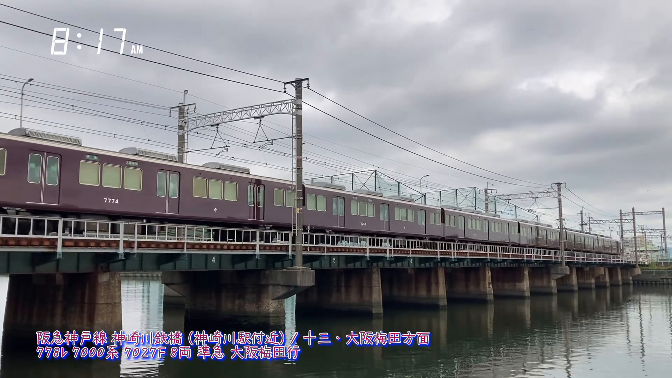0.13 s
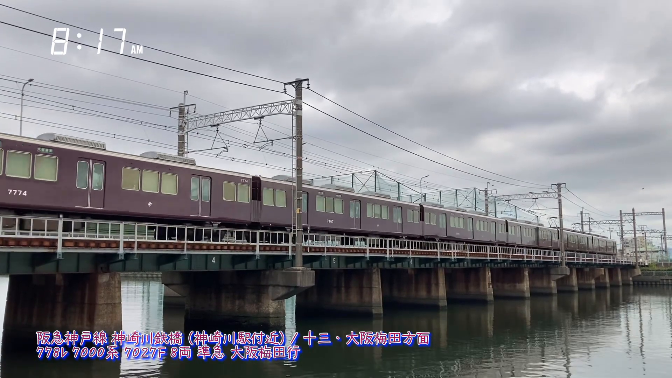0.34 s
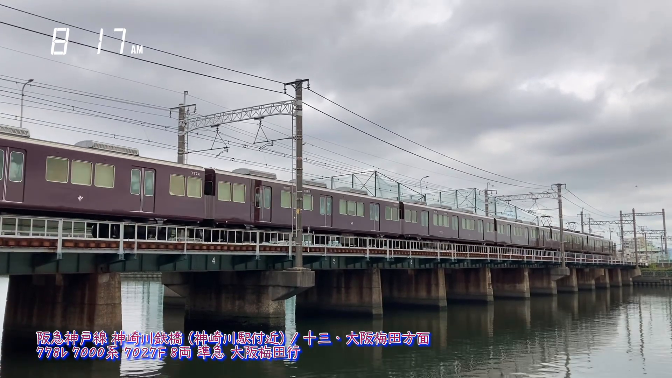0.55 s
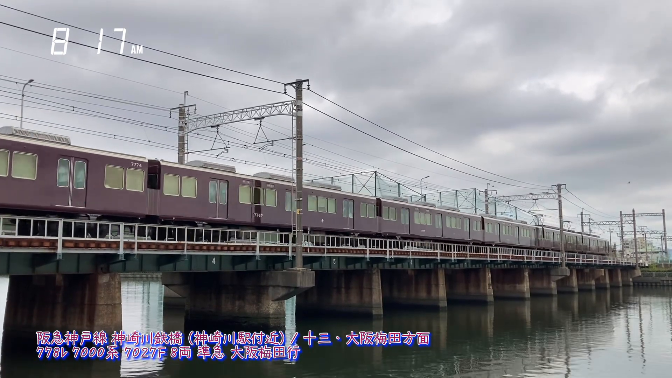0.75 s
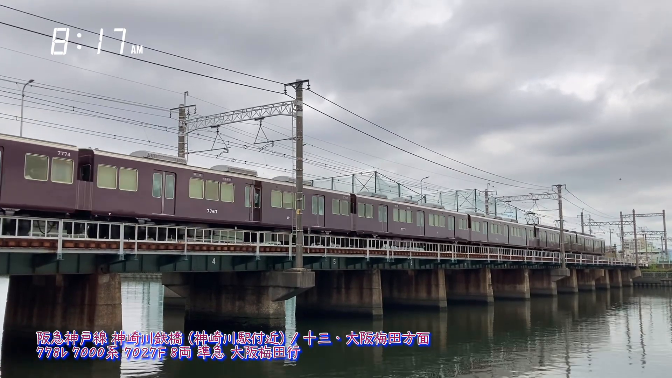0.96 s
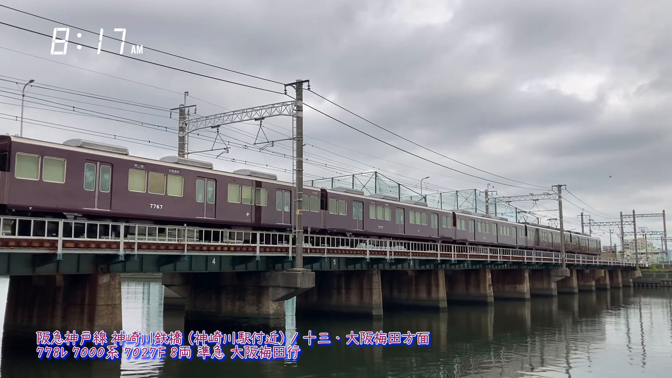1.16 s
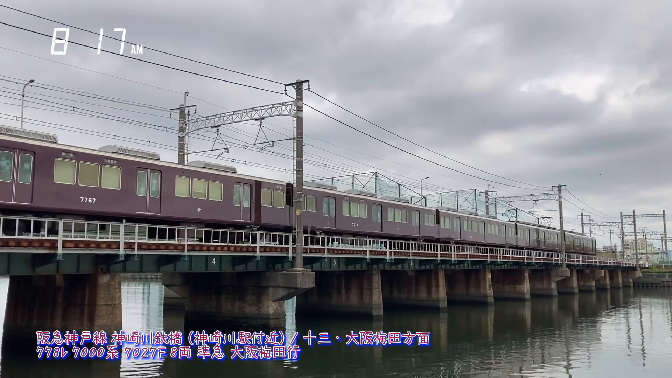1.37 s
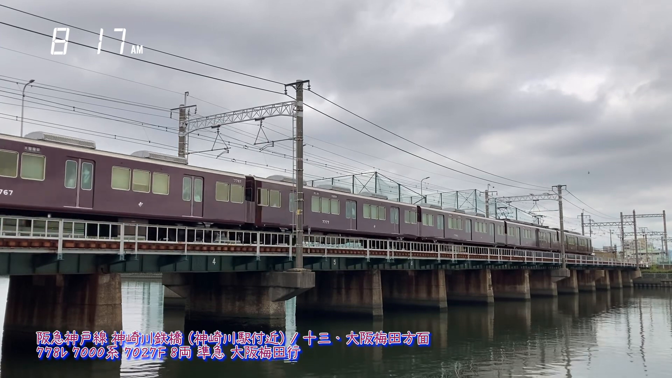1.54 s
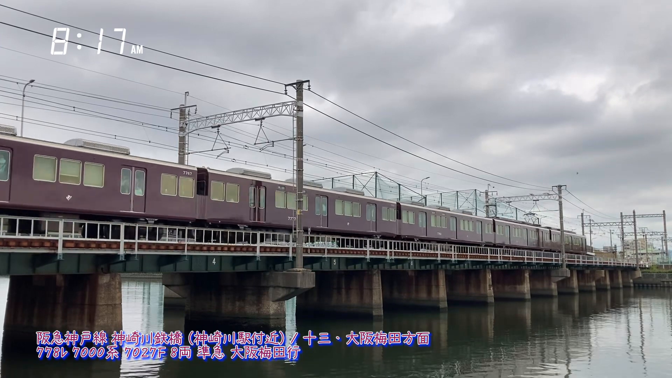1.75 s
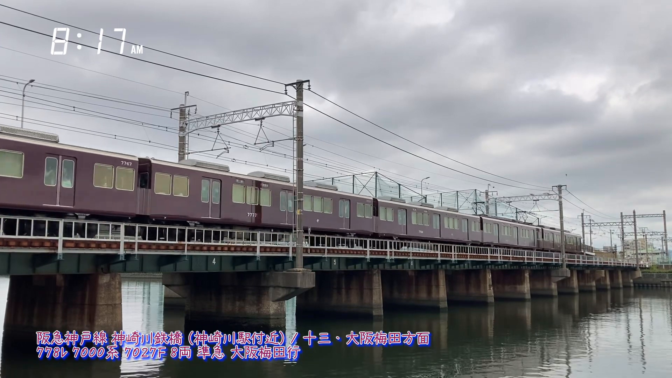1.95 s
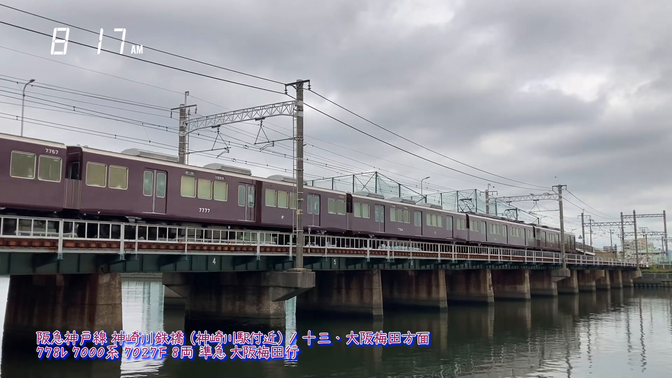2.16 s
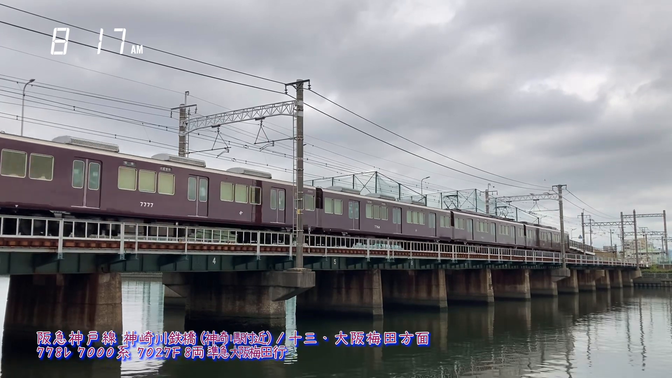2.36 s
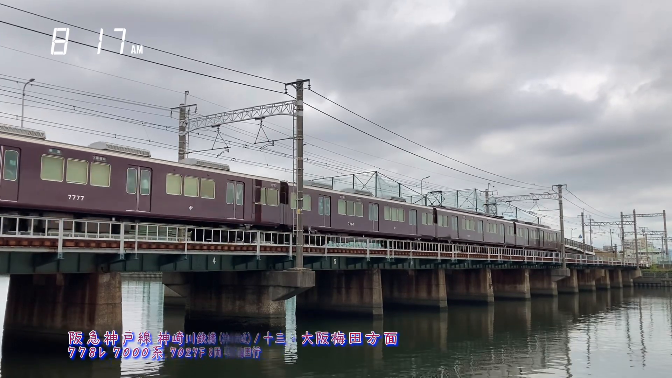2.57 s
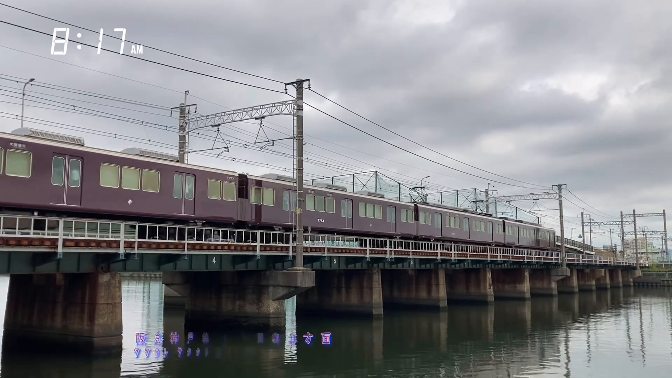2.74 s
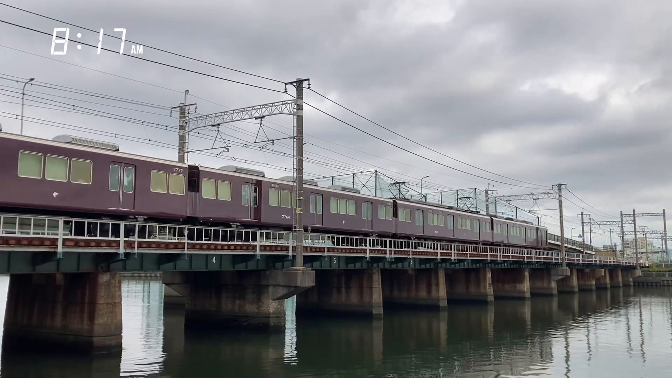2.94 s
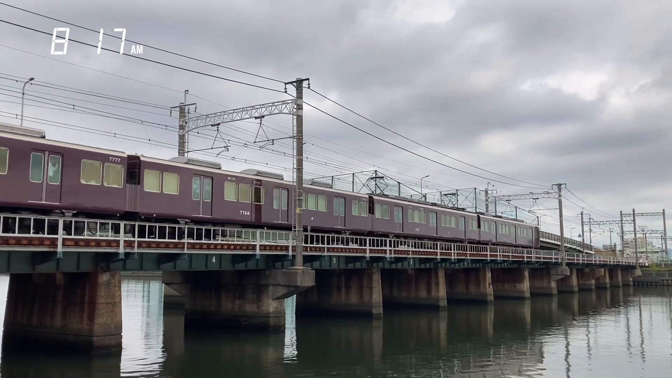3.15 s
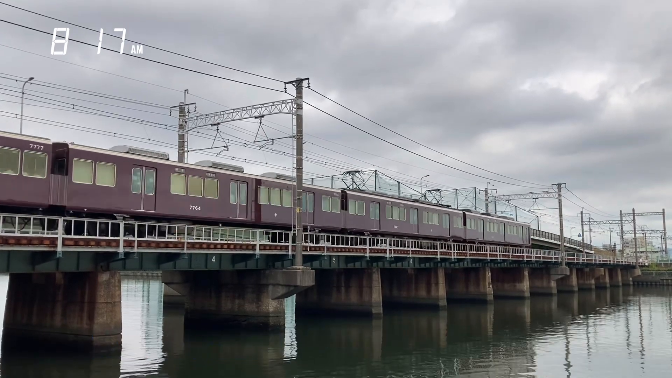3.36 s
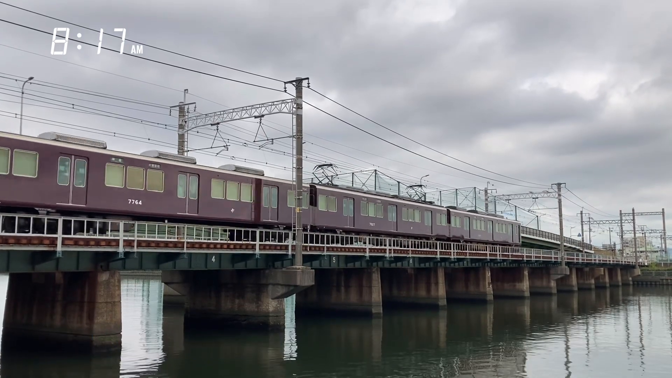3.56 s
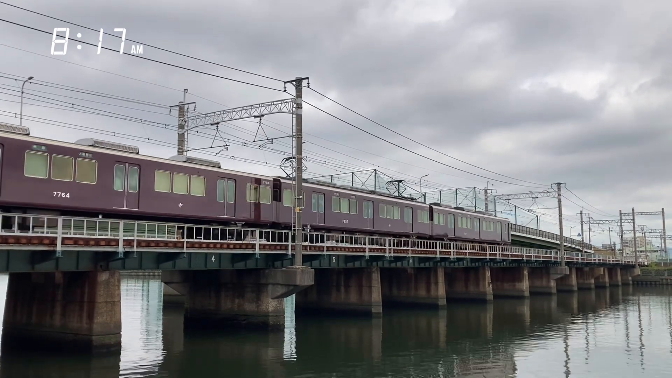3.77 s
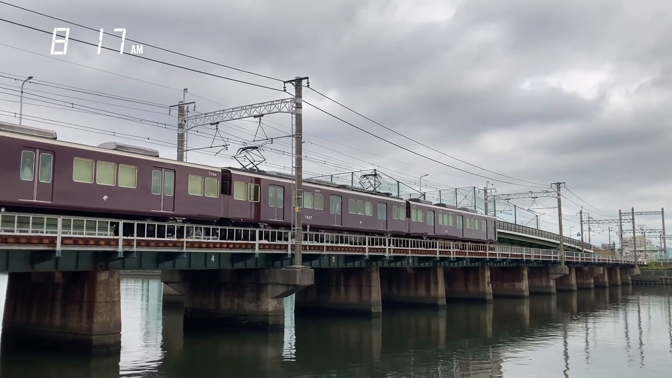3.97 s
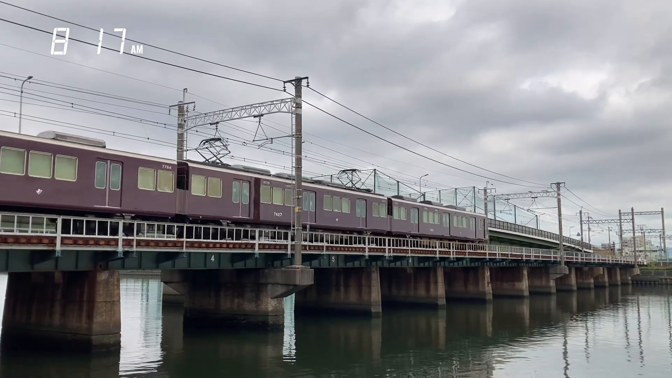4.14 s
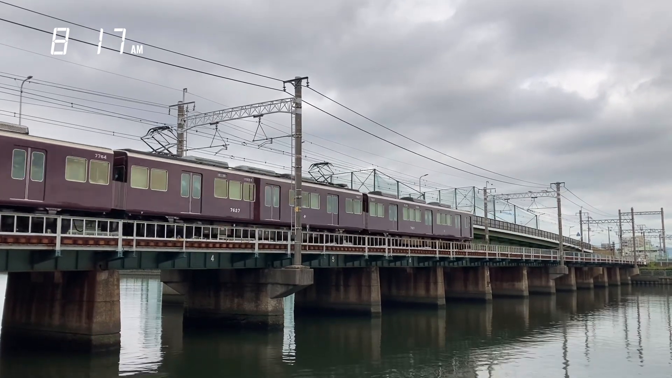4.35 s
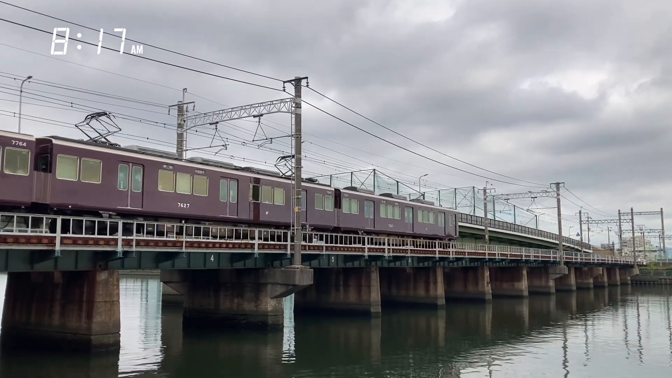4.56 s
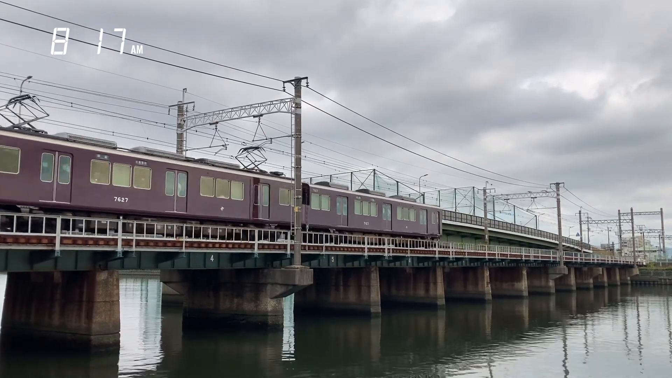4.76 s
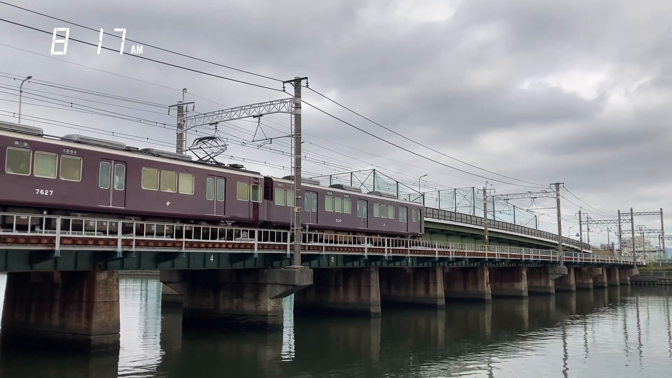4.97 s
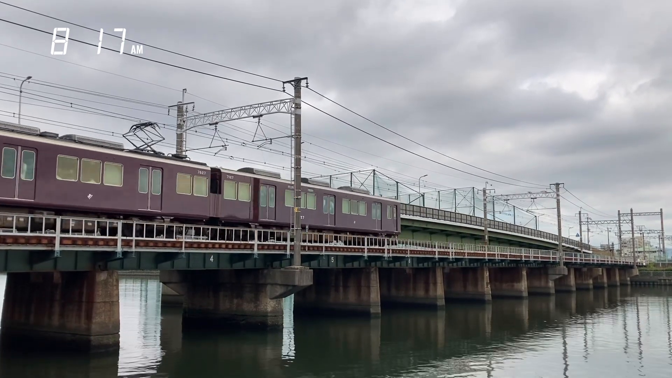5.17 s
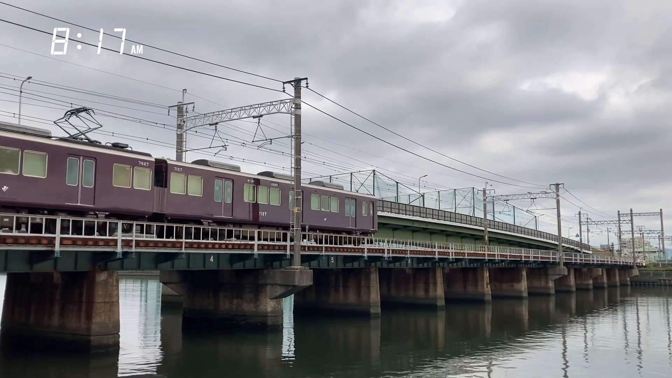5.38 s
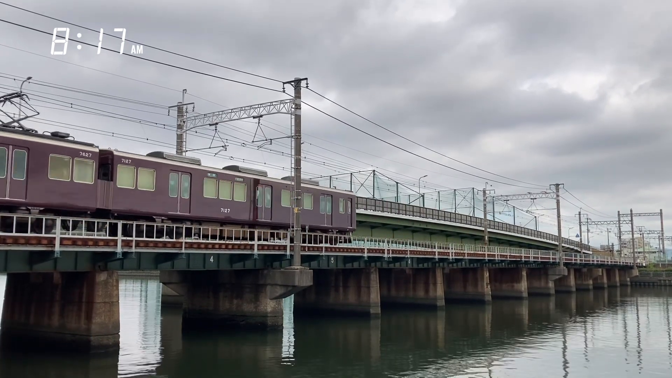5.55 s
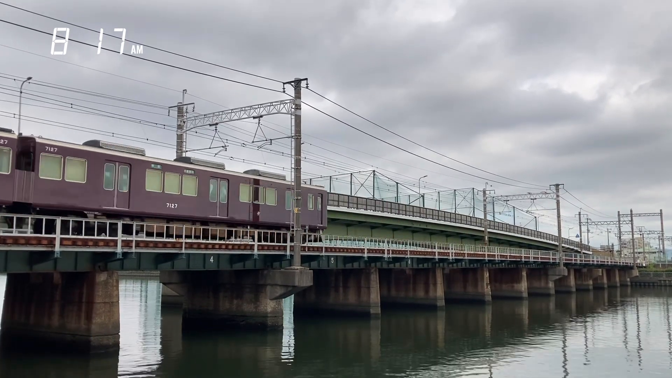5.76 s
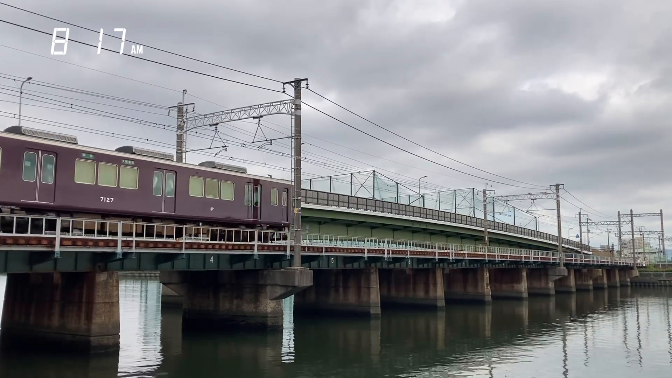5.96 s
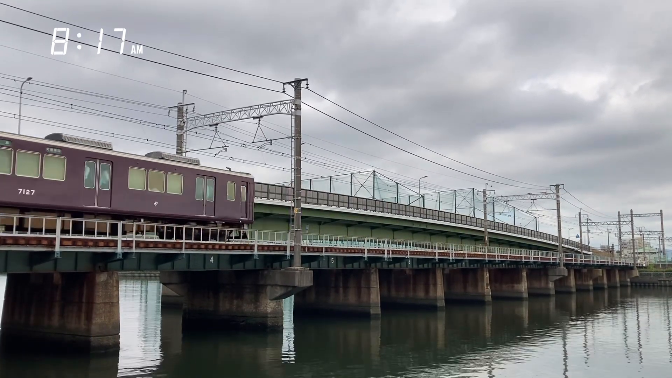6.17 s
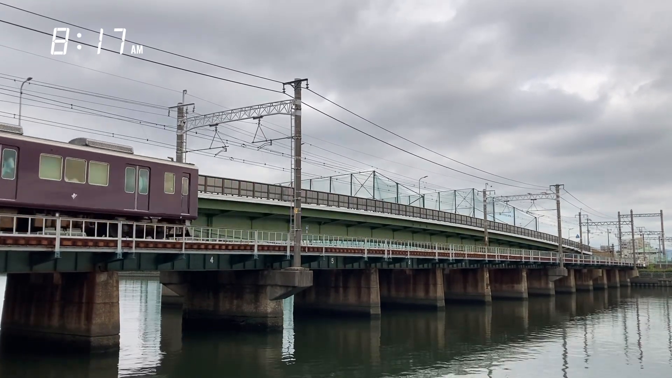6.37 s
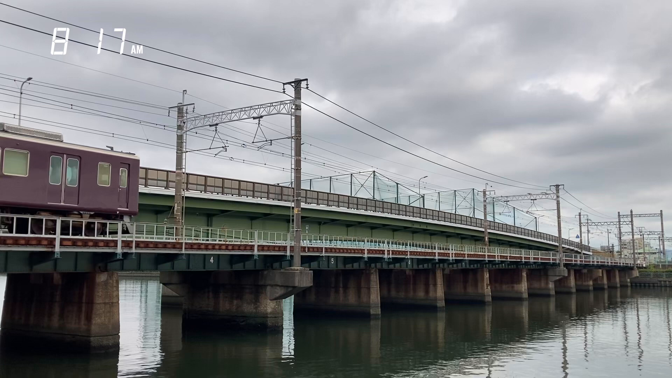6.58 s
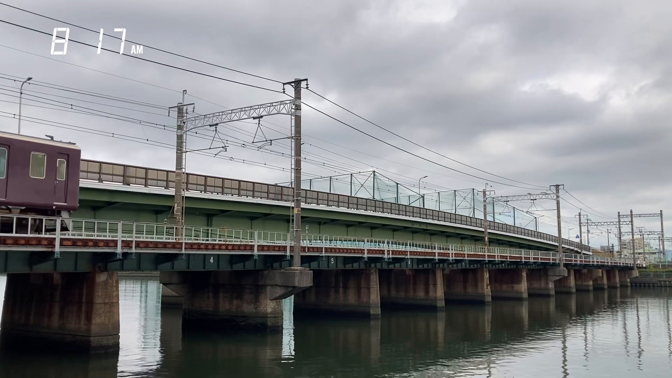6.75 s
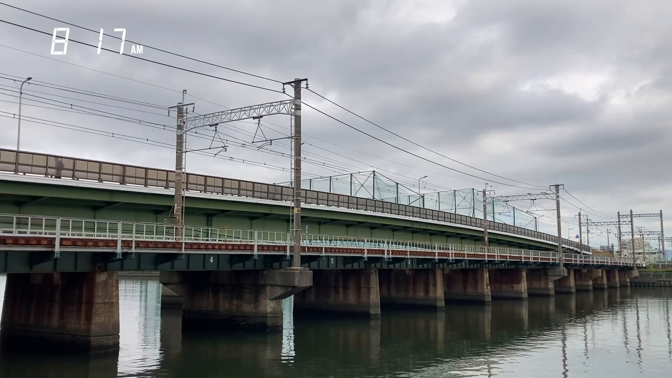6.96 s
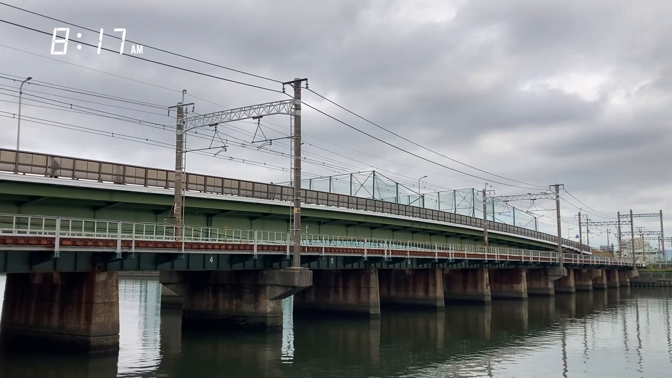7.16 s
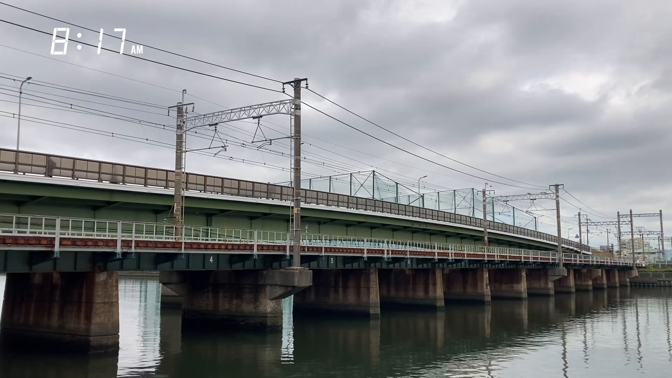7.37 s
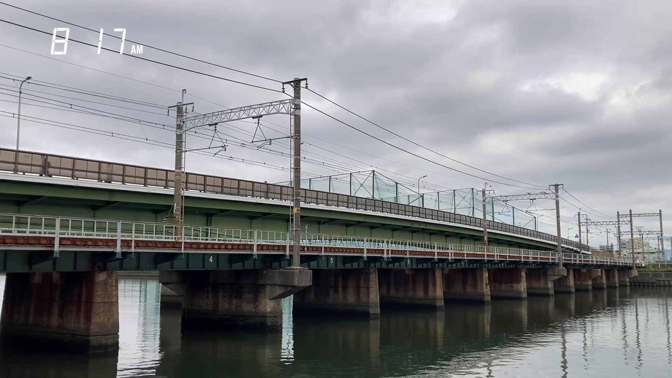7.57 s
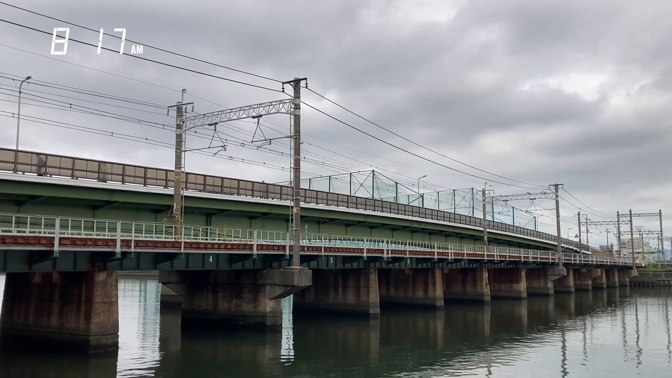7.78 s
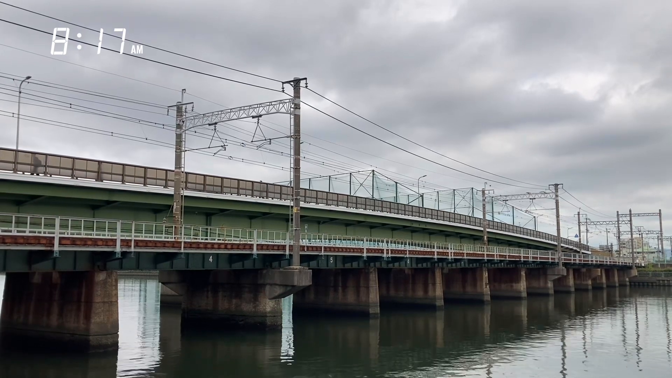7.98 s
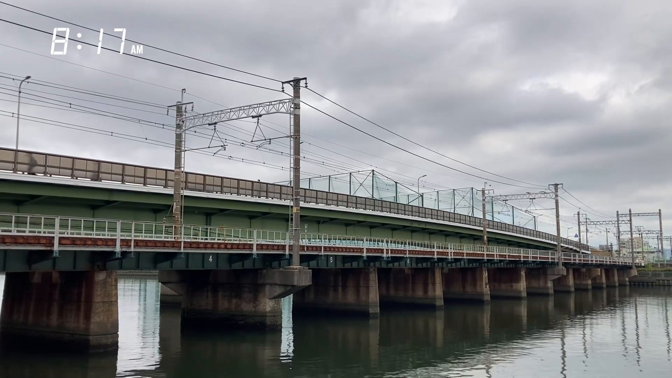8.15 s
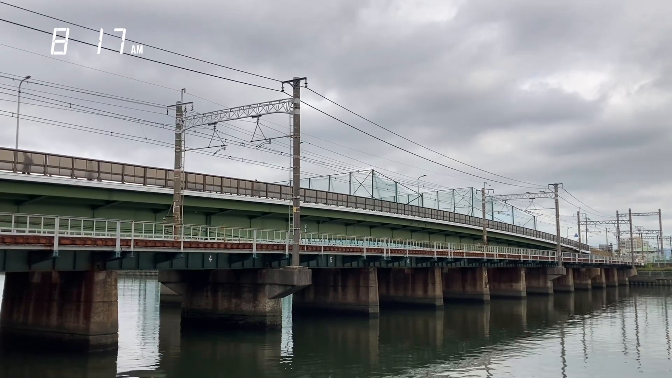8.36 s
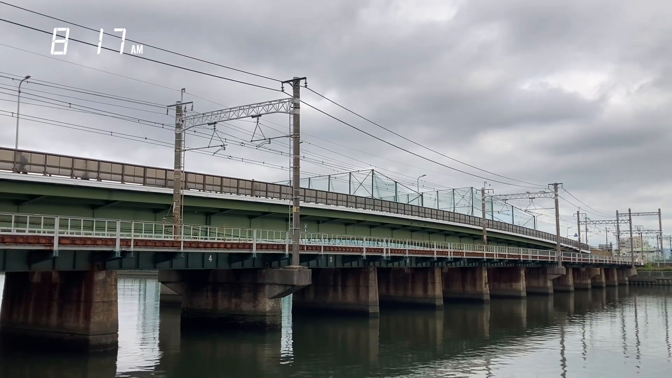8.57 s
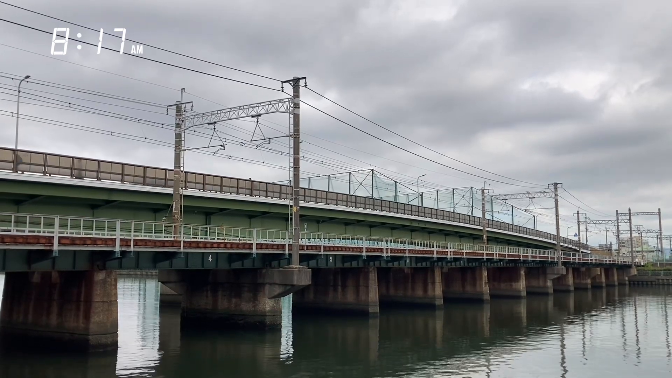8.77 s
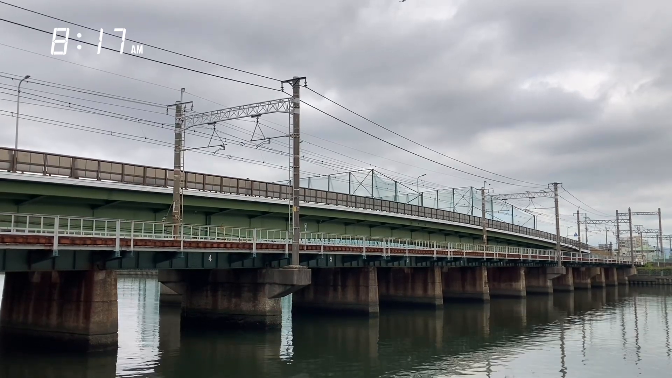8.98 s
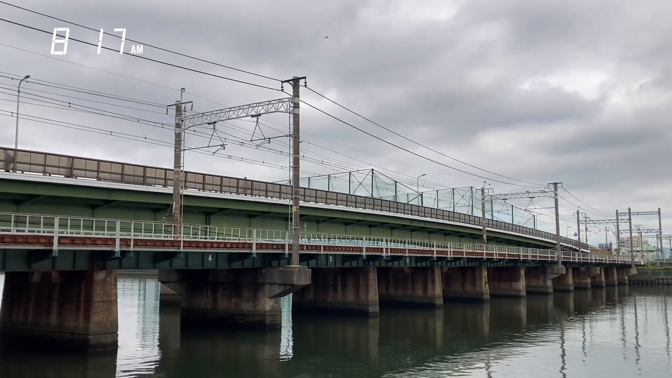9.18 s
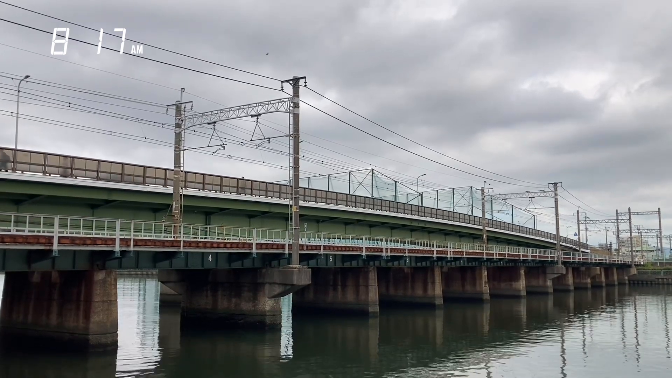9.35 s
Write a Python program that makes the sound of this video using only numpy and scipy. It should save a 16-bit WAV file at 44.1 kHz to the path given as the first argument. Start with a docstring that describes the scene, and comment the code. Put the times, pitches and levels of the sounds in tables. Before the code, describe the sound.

A long train passes close by on a riverside steel bridge. Paired wheel blows thump the deck, clank loose rail plates and ring the girders, answered by a second joint farther along. Rumble, roar and a rough rail singing fill the gaps. The last car passes, only distant double clanks remain, then the train fades into soft open-air hiss. Outdoor stereo microphones stand on the bank.

```python
"""Train on a girder bridge

An electric train of eight cars runs over a steel girder bridge across a river, heard from the bank.
Shaped noise makes the deck's rumble, the wheels' roar, the singing rails, far traffic and a hiss.
Each axle strikes a near rail joint and, about 1.5 s later, a far one; two cars begin past the near joint.
Bursts of noise, ringing tones and clicks make the blows; the train fades, leaving hiss and a faint whine."""
import sys
import numpy as np
from scipy import signal
from scipy.fft import rfft, irfft, next_fast_len
from scipy.io import wavfile
from scipy.ndimage import uniform_filter1d

SR = 44100
rng = np.random.default_rng(int(sys.argv[2]) if len(sys.argv) > 2 else 0)


def wrap_up_sound(samples):
    """Save the sound to the file named by the first command line argument, as 16-bit audio."""
    columns = np.atleast_2d(samples).T
    # keep every value between -1 and 1, then stretch to whole-number steps
    tamed = np.clip(columns, -1, 1)
    steps = np.round(tamed * 32767).astype(np.int16)
    wavfile.write(sys.argv[1], SR, steps)


N = 415422
TIME = np.arange(N) / SR
BLOW_SIZE = 49152  # samples in one joint blow
# In the tables, t60 is the time a sound takes to fall by 60 dB.


def from_db(db):
    """Turn decibels into a multiplying gain."""
    return 10 ** (np.asarray(db) / 20)


def rms_one(x):
    """Scale a sound to an average (rms) size of 1."""
    return x / np.sqrt(np.mean(x ** 2) + 1e-20)


def in_time(rows):
    """Read each column of a time table at every sample."""
    s, *columns = np.transpose(rows)
    return [np.interp(TIME, s, column) for column in columns]


def at_hz(rows, hz):
    """Read each column of a frequency table, joining its points on a log-frequency axis."""
    points, *columns = np.transpose(rows)
    return [np.interp(np.log(hz + 1e-3), np.log(points), column) for column in columns]


def drift(rate):
    """Wander at random through straight lines between `rate` points a second, with rms 1."""
    knots = rng.standard_normal(int(rate * N / SR) + 3)
    return rms_one(np.interp(TIME * rate, np.arange(len(knots)), knots))


def white(size):
    """Draw three unrelated noise spectra: one shared, and one for each microphone."""
    return rfft(rng.standard_normal((3, size)).astype(np.float32))


# In the high treble the two microphones have opposite polarity and the right one leads.
PAIR_SPLIT_HZ, TREBLE_RIGHT_LEAD_MS = 6200, 0.215


def stereo_colour(colour, size, stereo):
    """Give gains for direct sound, which reaches one microphone first, and for scattered sound."""
    hz = np.fft.rfftfreq(size, 1 / SR)
    alike, lead_ms, balance_db = at_hz(stereo, hz)
    alike = np.clip(alike, 0, 1)
    sides = np.array([[.5], [-.5]])  # left, right
    bass_cut = hz ** 2 / (hz ** 2 + 20 ** 2)
    gain = from_db(at_hz(colour, hz)[0] + sides * balance_db) * bass_cut
    treble_cycles = .5 - hz * TREBLE_RIGHT_LEAD_MS / 1000
    cycles = np.where(hz < PAIR_SPLIT_HZ, hz * lead_ms / 1000, treble_cycles)
    direct = gain * np.sqrt(alike) * np.exp(2j * np.pi * sides * cycles)
    return direct, gain * np.sqrt(1 - alike)


# The near joint and the steady sounds at the two microphones; the lead applies below the treble split:
# (frequency [Hz], likeness [0-1], left lead [ms], left minus right [dB])
NEAR_STEREO = [(60, 1, 0.22, 0), (127, 1, 0.51, -0.6), (307, 0.98, 0.16, 1.5), (480, 0.97, 0.35, 0),
               (670, 0.69, 0.2, 5), (1010, 0.8, 0.26, 4.5), (1380, 0.36, 0.23, 6), (1660, 0.62, 0.39, 2),
               (2300, 0, 0.22, 2), (4250, 0.39, 0.48, 1.5), (5900, 0.06, 0.454, 0.5), (7400, 1, 0.69, 0),
               (10200, 0.99, 0.52, 0)]


def noise(colour, size=N):
    """Make steady stereo noise of a given colour, rms 1, which repeats seamlessly."""
    size = next_fast_len(size, True) if size >= N else size
    direct, scattered = stereo_colour(colour, size, NEAR_STEREO)
    draw = white(size)
    sound = irfft(direct * draw[0] + scattered * draw[1:], size)
    return rms_one(sound[:, np.arange(N) % size])


# The train gathers a little speed after PULL_FROM_S.
SPEED_M_PER_S, PULL_FROM_S, PULL_M_PER_S2 = 16.2685, 2.55, 0.0393
START_M, FAR_JOINT_M = 37.373, 25.009  # leading axle at the start, and far joint, past the near joint
CAR_COUNT = 8
# car length, distance between its two bogies (wheel frames), distance between a bogie's two axles
CAR_M, BOGIE_M, AXLE_M = 19, 12.699, 2.115


def crossings(place_m):
    """Find when each axle reaches a place on the track, from the front of the train to the back."""
    t = np.linspace(-5, 12, num=1000)
    pull_m = PULL_M_PER_S2 / 2 * np.maximum(t - PULL_FROM_S, 0) ** 2
    lead_m = START_M + SPEED_M_PER_S * t + pull_m
    car_axles_m = [0, AXLE_M, BOGIE_M, BOGIE_M + AXLE_M]
    behind_m = CAR_M * np.arange(CAR_COUNT)[:, None] + car_axles_m
    return np.interp(place_m + behind_m.ravel(), lead_m, t)


def passing(steady, fade_db_per_s, spots):
    """Follow a level curve, swell as each axle passes each spot, and fade after the curve ends."""
    t = np.linspace(0, TIME[-1], num=4000)
    s, db = np.transpose(steady)
    level_db = np.interp(t, s, db) - fade_db_per_s * np.maximum(t - s[-1], 0)
    power = from_db(level_db) ** 2
    for place_m, spot_db, swell_s in spots:
        age = np.maximum(t - crossings(place_m)[:, None], 0) / swell_s
        swells = from_db(spot_db) * age * np.exp(1 - age)
        power = power + (swells ** 2).sum(0)
    return np.interp(TIME, t, np.sqrt(power))


# Steady shaking of the deck, before the heaves: (time [s], level [dB])
RUMBLE_LEVEL = [(0, -18), (5.9, -21), (6.55, -29), (7.1, -20), (7.6, -29), (8.1, -34.5)]
# Colour of the shaking: (frequency [Hz], relative level per Hz [dB])
RUMBLE_COLOUR = [(22, -42), (31, -41), (48, -24), (68, -21.5), (85, -3.5), (99, 2.5), (122, -7), (146, -4),
                 (180, -22.5), (260, -24.5), (400, -96)]
# Where each axle makes the deck heave: (place past near joint [m], peak level [dB], time to peak [s])
SOFT_SPOTS = [(0.3, -21, 0.022), (26.1, -21.5, 0.031)]


def rumble(car_s, repeat_share):
    """Car after car rolls over the same uneven track, so the deck's shaking partly repeats."""
    share = np.clip(repeat_share, 0, 1)
    track = noise(RUMBLE_COLOUR, size=round(car_s * SR))
    shake = np.sqrt(share) * track + np.sqrt(1 - share) * noise(RUMBLE_COLOUR)
    # even out the loudness over about 80 ms
    shake /= np.sqrt(uniform_filter1d(np.mean(shake ** 2, 0), size=3500))
    return shake * passing(RUMBLE_LEVEL, fade_db_per_s=9.5, spots=SOFT_SPOTS)


def resonate(x, peaks):
    """Lift the sound around each resonance of a rail."""
    for hz, width_hz, lift_db in peaks:
        band = signal.lfilter(*signal.iirpeak(hz, hz / width_hz, fs=SR), x + 1e-18)
        x = x + (from_db(lift_db) - 1) * band
    return x


# Wheels rolling on the rails, before surges, flutter and rail lift: (time [s], relative level [dB])
ROLL_LEVEL = [(0, -23.5), (3, -24.5), (5.7, -22.5), (6.4, -26.5), (7.1, -25.5), (7.55, -33), (8.1, -35)]
# Colour of the rolling: (frequency [Hz], relative level per Hz [dB])
ROLL_COLOUR = [(100, -12.5), (160, -2), (215, -1), (340, 1), (435, -3), (530, -4.5), (820, -6.5),
               (1100, -18), (1500, -21), (2200, -22), (3300, -31), (4500, -34.5), (5800, -35.5),
               (7500, -38.5), (11000, -40.5), (13000, -61), (15500, -72)]
# Surges behind each axle: (place past near joint [m], relative peak level [dB], time to peak [s])
SURGES = [(0.1, -28, 0.097), (26.3, -50, 0.15)]


def rolling(flutter_db, far_cut_hz):
    """The roar of the wheels flutters as they turn, and grows duller as the train leaves."""
    level = passing(ROLL_LEVEL, fade_db_per_s=11, spots=SURGES)
    roar = noise(ROLL_COLOUR) * level * from_db(flutter_db * drift(rate=34))
    gone = np.clip(np.interp(TIME, [7.3, 8.4], [0, .62]), 0, 1)
    dull = signal.lfilter(*signal.butter(1, far_cut_hz, fs=SR), roar)
    return (1 - gone) * roar + gone * dull


# Rails singing under the rougher wheels of the rear cars, before flutter: (time [s], level [dB])
SING_LEVEL = [(0, -41), (0.7, -40), (1.4, -48), (3, -40), (4.2, -34), (5.3, -34), (6, -33), (6.5, -68),
              (7.6, -70)]
# Colour of the singing: (frequency [Hz], relative level per Hz [dB])
SING_COLOUR = [(400, -40), (750, -10), (980, -4), (1220, -3), (1500, -14), (2400, -45), (6000, -70)]


def singing(flutter_db, swell_db):
    """A ringing band in the rails flutters as the wheels turn and swells more slowly."""
    wander_db = flutter_db * drift(rate=26) + swell_db * drift(rate=6.9)
    return noise(SING_COLOUR) * from_db(in_time(SING_LEVEL)[0] + wander_db)


# Colour of the distant traffic: (frequency [Hz], relative level per Hz [dB])
TRAFFIC_COLOUR = [(22, 3), (40, 0), (70, 20), (120, -18), (185, 10), (280, -22), (420, -3), (1000, -53)]


def traffic():
    """Many distant vehicles blur into a low noise that swells and sinks."""
    return from_db(-41.0 + 1.8 * drift(rate=6)) * noise(TRAFFIC_COLOUR)


# Loudness of the far-off hiss: (time [s], level [dB])
HISS_LEVEL = [(0, -40.5), (7.6, -46.5), (8.4, -46.5), (8.8, -45), (9.42, -44.5)]
# Colour of the hiss: (frequency [Hz], relative level per Hz [dB])
HISS_COLOUR = [(300, 1), (1500, -2), (3000, -4.5), (4900, 1), (5900, -10), (8500, -11.5), (11000, -16.5),
               (15500, -28)]


def hiss():
    """Broad noise of a fixed colour follows a slow level curve."""
    return noise(HISS_COLOUR) * from_db(in_time(HISS_LEVEL)[0])


def axle_hits(place_m, strengths):
    """List one blow per axle on a joint after the start, as (time [s], strength [dB])."""
    return [(s, db) for s, db in zip(crossings(place_m), np.ravel(strengths)) if s > 0]


def bogie_bias(hits, leading_db):
    """Give the leading axle of each bogie what the trailing one loses."""
    return [(s, db + leading_db * (-1) ** k) for k, (s, db) in enumerate(hits)]


# How a blow swells and dies in the steelwork, before each joint scales both times:
# (frequency [Hz], relative swell [s], relative t60 [s])
BLOW_SHAPE = [(80, 0.018, 0.71), (294, 0.014, 0.54), (790, 0.017, 0.34), (2180, 0.02, 0.44),
              (6030, 0.014, 0.31), (14000, 0.0014, 0.64)]


def joint(hits, colour, swell, ring, tail_db, tail_t60, repeat_hz, patchy_db, grain_db, stereo):
    """Each axle rings the dense modes of rail and steelwork: alike in the bass, new in the treble."""
    t, hz = np.arange(BLOW_SIZE) / SR, np.fft.rfftfreq(BLOW_SIZE, 1 / SR)
    centres = np.geomspace(60, 14000, num=10)  # ten overlapping bands
    bands = np.array([np.interp(np.log(hz + 1), np.log(centres), row) for row in np.eye(len(centres))])
    rise, t60 = at_hz(BLOW_SHAPE, centres[:, None])
    # the blow spreads along the girders, dies, and leaves a weak echo under the bridge
    onset = 1 - np.exp(-t / (rise * swell))
    decay = from_db(-60 * t / (t60 * ring)) + from_db(tail_db - 60 * t / tail_t60)
    shape = onset * decay * np.minimum(1, 5 * (1 - t / t[-1]))  # ends in silence
    direct, scattered = stereo_colour(colour, BLOW_SIZE, stereo)
    power = (bands ** 2 * (abs(direct) ** 2 + abs(scattered) ** 2).sum(0)).sum(1)
    energy = power / power.sum() * (shape ** 2).sum(1)
    same = 1 / (1 + (hz / repeat_hz) ** 2)
    bands, shape, same = (a.astype(np.float32) for a in (bands, shape, same))
    steelwork, out = white(BLOW_SIZE), np.zeros((2, N + BLOW_SIZE))
    for s, db in hits:
        draw = np.sqrt(same) * steelwork + np.sqrt(1 - same) * white(BLOW_SIZE)
        spectrum = direct * draw[0] + scattered * draw[1:]
        rings = irfft(bands[:, None] * spectrum.astype(np.complex64)) * shape[:, None]
        # echoes from many girders arrive in uneven clumps, heard above the bass
        clumps = np.interp(t * 220, np.arange(400), np.clip(rng.standard_normal(size=400), -2, 2))
        rings[np.searchsorted(centres, 250):] *= from_db(grain_db * clumps).astype(np.float32)
        gains = np.sqrt(energy / np.einsum("bct,bct->b", rings, rings))
        # each axle has a colour of its own
        gains *= from_db(patchy_db * rng.standard_normal(len(centres)))
        blow = np.einsum("b,bct->ct", gains.astype(np.float32), rings)
        start = max(0, round(s * SR))
        out[:, start:start + BLOW_SIZE] += from_db(db) * blow
    return out[:, :N]


# Tones of a struck wheel, before each joint scales them:
# (relative frequency [Hz], relative level [dB], relative t60 [s])
WHEEL = [(1717, 5.5, 0.041), (2065, -0.5, 0.1), (2262, -1.5, 0.091), (2385, 0, 0.035), (2700, -4.5, 0.091),
         (2933, -5, 0.15), (3340, -7, 0.11), (4120, -11, 0.07), (4280, -5.5, 0.081), (4780, -9, 0.06)]


def wheels_ring(hits, doppler, sustain, detune, scatter_db, chatter_s, lead_s):
    """A struck wheel chatters and rings; tuning varies, and `doppler` below 1 flattens receding wheels."""
    hz, mode_db, t60 = np.transpose(WHEEL)[:, :, None]
    t, out = np.arange(BLOW_SIZE // 4) / SR, np.zeros(N + BLOW_SIZE)
    for s, db in hits:
        tuning, strength, sign = rng.standard_normal((3, len(WHEEL), 1))
        strength_db = db + mode_db + scatter_db * np.clip(strength, -1.5, 1.5)
        height = np.sign(sign) * from_db(strength_db - 60 * t / (t60 * sustain))
        tones = np.sin(2 * np.pi * hz * doppler * (1 + detune * tuning) * t)
        ring = (height * tones).sum(0)
        # the first contact is followed by weaker ones at uneven gaps
        for late in np.append(0, rng.random(size=6)):
            start = max(0, round((s + late * chatter_s) * SR))
            out[start:start + len(t)] += from_db(-12 * late) * ring
    return np.array([out[:N], np.interp(TIME - lead_s, TIME, out[:N])])


def knocks(hits, hz, contact_s, lead_s):
    """The wheel drops onto the rail end: one hard tick that arrives before the bridge answers."""
    t, out = np.arange(BLOW_SIZE // 32) / SR, np.zeros(N + BLOW_SIZE)
    for (s, db), tuning in zip(hits, rng.uniform(-1.9, 1, len(hits))):
        press = t / contact_s * np.exp(1 - t / contact_s)
        tick = press * np.sin(2 * np.pi * hz * (1 + 0.086 * tuning) * t)
        start = max(0, round((s + 0.00307) * SR))
        out[start:start + len(t)] += from_db(db) * tick
    return np.array([out[:N], np.interp(TIME - lead_s, TIME, out[:N])])


def mode(clicks, hz, t60):
    """A unit click sets a fading sine ringing, with a starting height of about 1."""
    r, w = from_db(-60 / (t60 * SR)), 2 * np.pi * hz / SR
    return signal.lfilter([0, np.sin(w)], [1, -2 * r * np.cos(w), r * r], clicks + 1e-18)


# Ringing of the fishplates (bars that join rails) and bolts:
# (frequency [Hz], relative level [dB], t60 [s])
FISHPLATE = [(1690, -1.5, 0.017), (2110, 2, 0.044), (2550, -15, 0.02), (2920, -5.5, 0.037),
             (3780, 3, 0.011), (4360, -15, 0.013)]


def rattle(hits, delay_s, spread_s, count):
    """As weight lands on the next rail, fishplates clank in a quick, uneven burst of contacts."""
    s, db = np.transpose(hits)[:, :, None]
    late = np.abs(delay_s + spread_s * rng.standard_normal((len(hits), count)))
    at = np.round((s + late) * SR).astype(int)
    force = from_db(db) * rng.uniform(0.38, 0.93, late.shape)
    out = np.zeros((2, N))
    for hz, mode_db, t60 in FISHPLATE:
        clicks = np.zeros((2, N))
        clicks[:, at] = force * rng.choice([-1, 1], (2, *at.shape))
        out += from_db(mode_db) * mode(clicks, hz, t60)
    return out


# Low ringing tones of the girders, before the bass cut: (frequency [Hz], relative level [dB], t60 [s])
GIRDER = [(76, 24, 0.09), (94.6, 24.5, 0.2), (99.94, 9.5, 1.46), (112.9, 0.5, 2.7), (120, 16, 0.14),
          (146.8, 7, 0.43), (128.3, 0.5, 1.7), (148.6, 3.5, 1.75), (259, 8.5, 0.11), (329.3, 12, 0.24),
          (382, 17, 0.11), (468, 11, 0.12), (636, 7, 0.058)]


def girders(hits, travel_s, scatter_db):
    """The lowest girder modes ring on after each blow, each with a strength of its own."""
    s, db = np.transpose(hits)
    at, out = np.round((s + travel_s) * SR).astype(int), np.zeros(N)
    strengths = from_db(db[:, None] + scatter_db * rng.standard_normal((len(hits), len(GIRDER))))
    for k, (hz, mode_db, t60) in enumerate(GIRDER):
        clicks = np.zeros(N)
        clicks[at] = strengths[:, k] * from_db(mode_db) * (-1) ** (k + 1)
        out += mode(clicks, hz, t60)
    # cut the bass below about 80 Hz, leaving the ringing tones
    out = signal.sosfilt(signal.butter(3, 80, "high", fs=SR, output="sos"), out)
    return np.array([out, np.interp(TIME - .0006, TIME, out)])


def thumps(hits, shape, scatter_db):
    """One short, deep punch per axle as its weight drops onto the span."""
    out = np.zeros(N)
    for axle, (delay_s, hz, thump_db, t60) in enumerate(shape):
        s, db = np.transpose(hits[axle::2])
        at = np.round((s + delay_s) * SR).astype(int)
        clicks = np.zeros(N)
        clicks[at] = from_db(db + thump_db + scatter_db * rng.standard_normal(len(s)))
        out += mode(clicks, hz, t60)
    out = signal.sosfilt(signal.butter(2, [75, 330], "band", fs=SR, output="sos"), out)
    return np.array([out, np.interp(TIME - .0004, TIME, out)])


def echoed(x, delay_s, echo_db, cut_hz):
    """The road bridge behind throws a dull echo back."""
    dull = signal.sosfilt(signal.butter(2, [120, cut_hz], "band", fs=SR, output="sos"), x + 1e-18)
    echo = np.array([np.interp(TIME - delay_s, TIME, side) for side in dull])
    return x + from_db(echo_db) * echo


# Colour of a blow on the far joint: (frequency [Hz], relative level per Hz [dB])
FAR_COLOUR = [(30, -42), (65, -1.5), (108, 2.5), (220, -10), (380, -9), (600, -9), (850, -9.5),
              (1200, -20.5), (2200, -22), (2800, -25.5), (3500, -25.5), (4600, -33.5), (5800, -37),
              (7500, -38), (11000, -46.5), (15000, -65)]
# Far joint, well to the left, at the microphones; the lead applies below the treble split:
# (frequency [Hz], likeness [0-1], left lead [ms], left minus right [dB])
FAR_STEREO = [(60, 0.6, 0.5, -2), (131, 0.96, 0.89, 0.5), (400, 0.95, 0.47, 2), (750, 0.66, 0.57, 4.5),
              (1350, 0.89, 0.41, -6.5), (2010, 0.9, 0.44, -1), (4200, 0.9, 0.427, -1.5),
              (5630, 0.46, 0.423, -2), (7000, 1, 0.42, -0.5)]
# Rail resonances at the far joint: (frequency [Hz], width [Hz], lift [dB])
FAR_RAIL = [(451, 17, 2.5), (746, 84, 0.72), (1620, 180, 2), (2180, 93, 1.3), (2720, 160, 4.9),
            (4730, 750, 5.5)]
# Blows of each car, one row a car, front to back:
# (first axle [relative dB], second axle [relative dB], third axle [relative dB], fourth axle [relative dB])
FAR_STRIKES = [(-14, -14, -11.5, -15), (-12, -14, -11.5, -15.5), (-15.5, -15, -16.5, -19),
               (-14.5, -13.5, -16, -17.5), (-13.7, -14, -14.5, -18.5), (-13.5, -14.5, -16.5, -20),
               (-13.5, -15, -12.5, -13), (-13, -12.5, -11.5, -13)]
# Change for each car's wheels, front to back; nothing screens the last: (level change [dB])
FAR_WHEELS = [1, -0.5, 1.5, 0.5, 1.5, -1, -0.5, 2.5]
# Deep thumps under a bogie's leading and trailing axles, before filtering:
# (delay [s], frequency [Hz], level above the blow [dB], t60 [s])
FAR_THUMP = [(0.039, 89, 3.9, 0.062), (0.043, 87, 5.5, 0.031)]


def far_joint():
    """Crisp, lighter clanks come from wheels that run away from the listener."""
    hits = axle_hits(FAR_JOINT_M, FAR_STRIKES)
    wheels = axle_hits(FAR_JOINT_M, np.array(FAR_STRIKES) + np.array(FAR_WHEELS)[:, None])
    steel = from_db(0.5) * joint(
        bogie_bias(hits, leading_db=-0.3), FAR_COLOUR, swell=0.55, ring=1.03, tail_db=-20.5, tail_t60=4.1,
        repeat_hz=336, patchy_db=2.06, grain_db=1.0, stereo=FAR_STEREO)
    ring = from_db(-21.5) * wheels_ring(
        wheels, doppler=0.947, sustain=1.1, detune=0.008, scatter_db=4.0, chatter_s=.07, lead_s=0.00045)
    knock = from_db(-9.0) * knocks(
        bogie_bias(wheels, leading_db=-4.0), hz=2250, contact_s=0.00069, lead_s=0.00041)
    clank = from_db(-21.0) * rattle(wheels, delay_s=0.02, spread_s=0.016, count=9)
    boom = from_db(-22.0) * girders(bogie_bias(hits, leading_db=0.5), travel_s=0.028, scatter_db=2.0)
    thump = thumps(hits, FAR_THUMP, scatter_db=0.5)
    bridge = resonate(steel, FAR_RAIL) + boom + thump
    return echoed(bridge, delay_s=0.075, echo_db=-9.0, cut_hz=960) + ring + knock + clank


# Colour of a blow on the near joint: (frequency [Hz], relative level per Hz [dB])
NEAR_COLOUR = [(30, -42), (65, -29), (97, -13), (205, -11.5), (335, 0), (520, -9), (850, -10.5),
               (1500, -23), (2800, -25.5), (4200, -26), (5600, -33), (7500, -32.5), (11000, -36),
               (12500, -46.5), (15500, -57)]
# Rail resonances beside the listener: (frequency [Hz], width [Hz], lift [dB])
NEAR_RAIL = [(640, 260, 1.5), (1214, 590, 2.5), (2033, 145, 5), (2922, 41, 9), (3830, 760, 3.5)]
# How hard each car strikes, front to back: (relative level [dB])
CAR_STRIKES = [-28.5, -28.5, -28.5, -29, -28, -28.5, -28, -28]
# What a car's four axles add, front to back: (level change [dB])
AXLE_STRIKES = [-0.46, -0.35, 0.56, -0.94]
# The deck takes the weight of a bogie's leading and trailing axles, before filtering:
# (delay [s], frequency [Hz], level above the blow [dB], t60 [s])
NEAR_THUMP = [(0.0218, 129, 25.5, 0.031), (0.041, 112, 23, 0.075)]


def near_joint():
    """Heavy, bright blows ring the wheels, clank the fishplates, thump the deck and swell in the steel."""
    hits = axle_hits(0, np.add.outer(CAR_STRIKES, AXLE_STRIKES))
    steel = from_db(19.5) * joint(
        hits, NEAR_COLOUR, swell=0.76, ring=0.97, tail_db=-29.0, tail_t60=3.7,
        repeat_hz=504, patchy_db=1.06, grain_db=0.4, stereo=NEAR_STEREO)
    ring = from_db(-19.0) * wheels_ring(
        hits, doppler=0.99, sustain=0.81, detune=0.0048, scatter_db=11.5, chatter_s=0.1, lead_s=0.0004)
    clank = from_db(-4.0) * rattle(hits, delay_s=0.018, spread_s=0.009, count=9)
    chatter = from_db(-8.0) * rattle(hits, delay_s=0.041, spread_s=0.031, count=4)
    boom = from_db(-1.5) * girders(bogie_bias(hits, leading_db=0.0), travel_s=0.0178, scatter_db=1.5)
    thump = thumps(hits, NEAR_THUMP, scatter_db=1.2)
    return resonate(steel, NEAR_RAIL) + ring + clank + chatter + boom + thump


# The faint whine, before its random waver, flicker and left-right balance:
# (time [s], frequency [Hz], level [dB])
WHINE = [(7.65, 1410, -72), (7.8, 1400, -52), (7.96, 1440, -56), (8.1, 1405, -53), (8.35, 1420, -57),
         (8.5, 1470, -53), (8.66, 1425, -53), (8.75, 1375, -54), (8.82, 1330, -63), (8.98, 1240, -76)]


def whine(waver, wander, flicker_db):
    """A thin, rough sine wavers in pitch and flickers in level, louder on the left."""
    hz, db = in_time(WHINE)
    bend = 1 + waver * drift(rate=170) + wander * drift(rate=24)
    phase = 2 * np.pi * np.cumsum(hz * bend) / SR
    balance_db = np.array([[1.5], [-1.5]])
    return np.sqrt(2) * np.sin(phase) * from_db(db + flicker_db * drift(rate=28) + balance_db)


def scene():
    """Add the shaking deck, rolling train, singing rails, far surroundings and two joints."""
    deck = rumble(car_s=CAR_M / SPEED_M_PER_S, repeat_share=0.57)
    roar = from_db(1.47) * resonate(rolling(flutter_db=1.5, far_cut_hz=180), NEAR_RAIL)
    train = deck + roar + singing(flutter_db=1.0, swell_db=-3.0)
    surroundings = traffic() + hiss() + whine(waver=0.016, wander=0.0048, flicker_db=3.0)
    return train + surroundings + far_joint() + near_joint()


def record(dry):
    """The microphones drop the deepest bass, the highest peaks are rounded and the top is cut."""
    peak_limit, bass_cut_hz, treble_cut_hz = 1.3, 36, 16800
    sound = signal.sosfilt(signal.butter(4, bass_cut_hz, "high", fs=SR, output="sos"), dry)
    rounded = peak_limit * np.tanh(sound / peak_limit)
    return signal.sosfilt(signal.cheby2(14, 70, treble_cut_hz, fs=SR, output="sos"), rounded)


dry = scene()
out = record(dry)
wrap_up_sound(out)
```